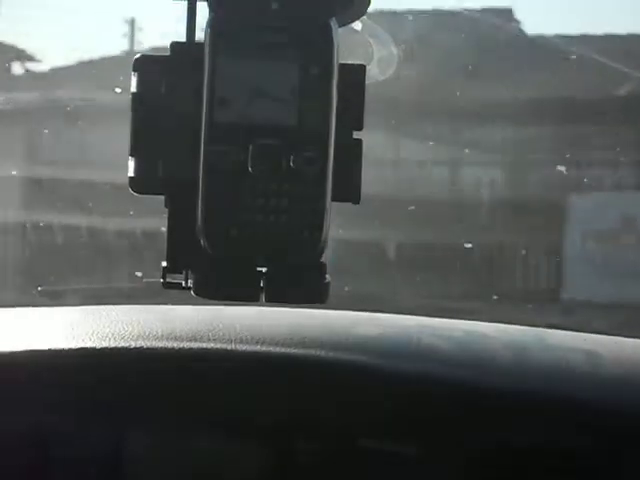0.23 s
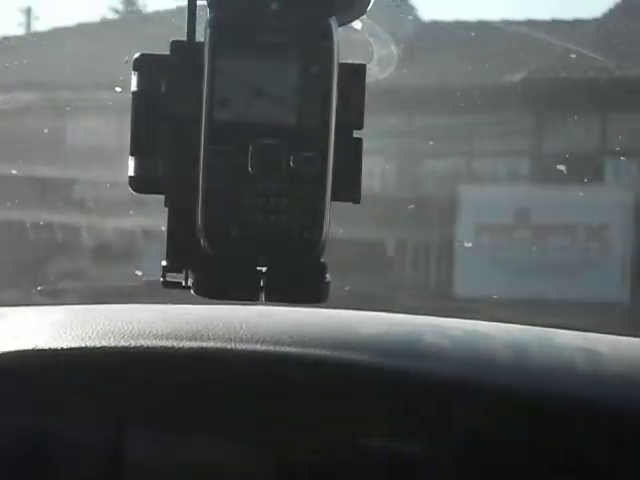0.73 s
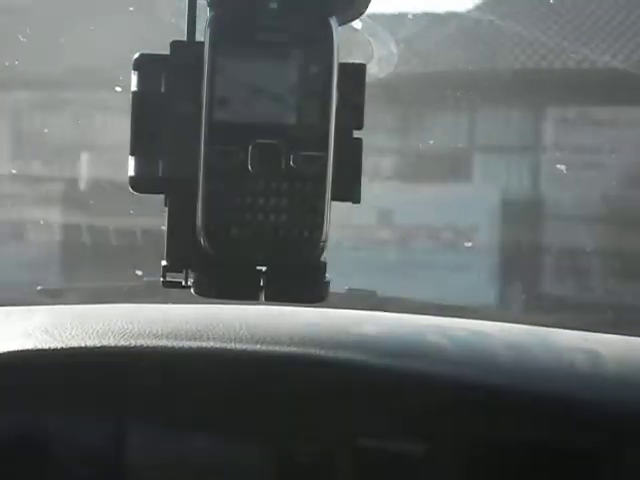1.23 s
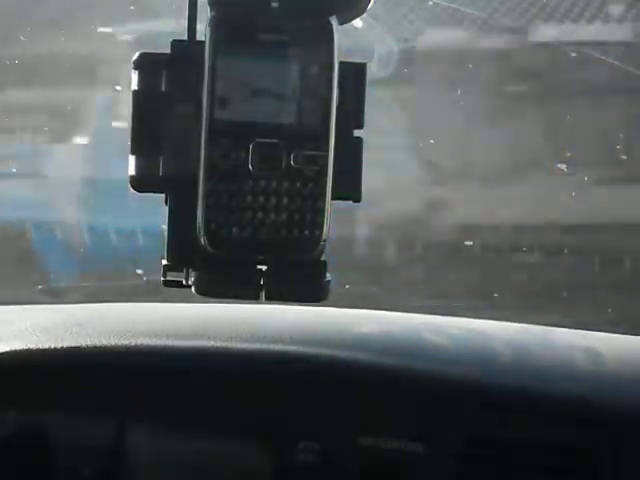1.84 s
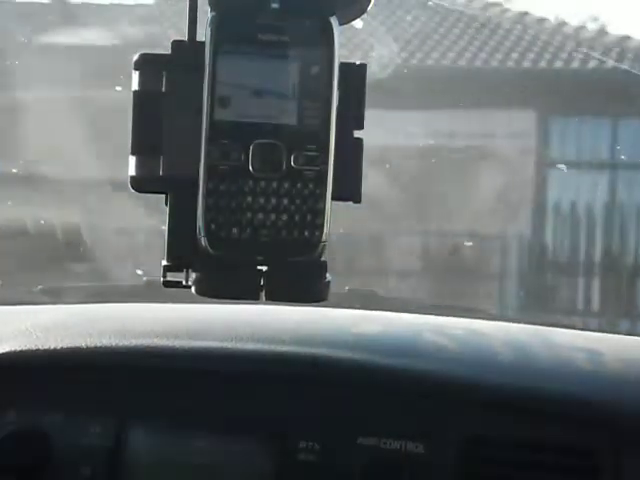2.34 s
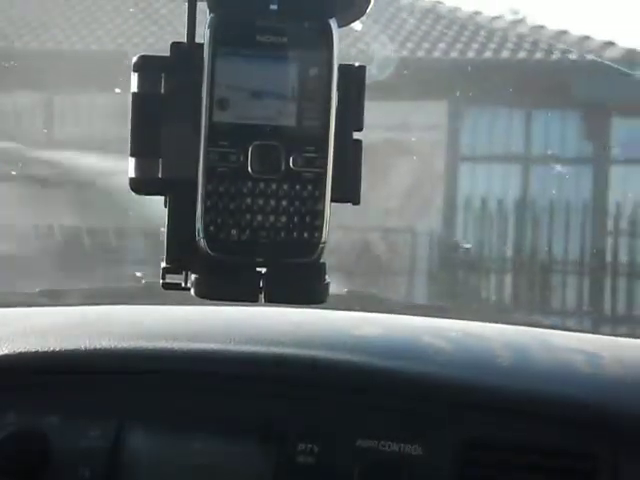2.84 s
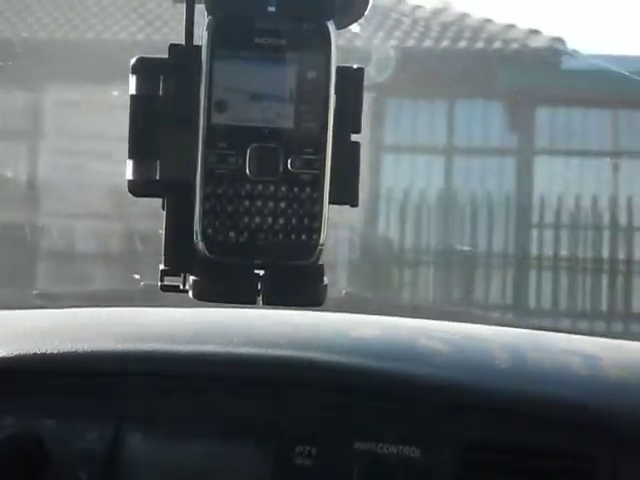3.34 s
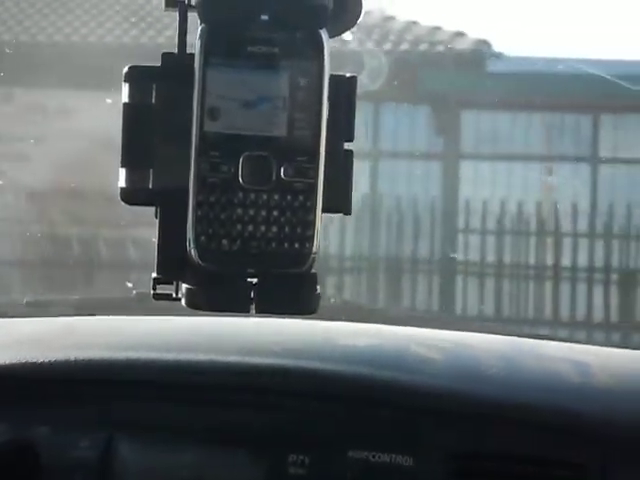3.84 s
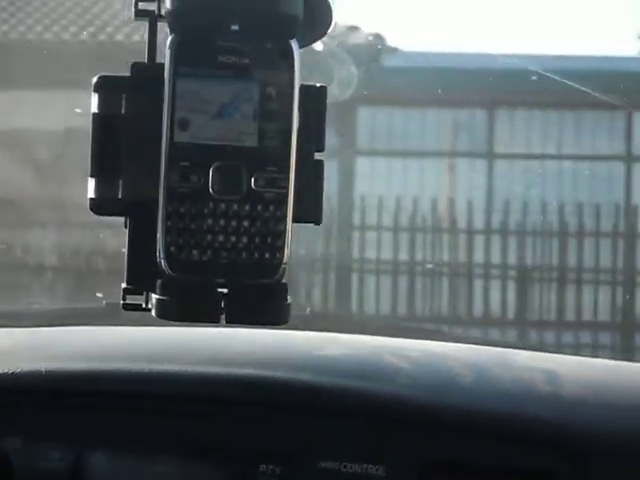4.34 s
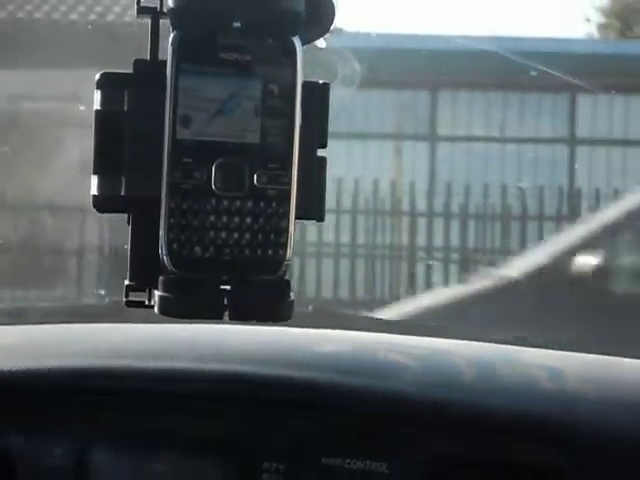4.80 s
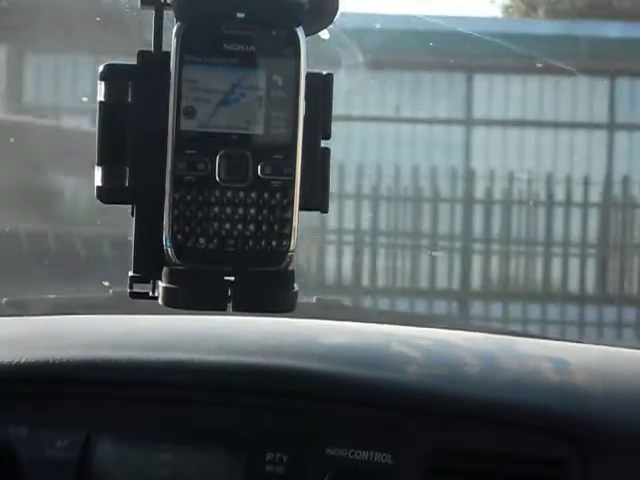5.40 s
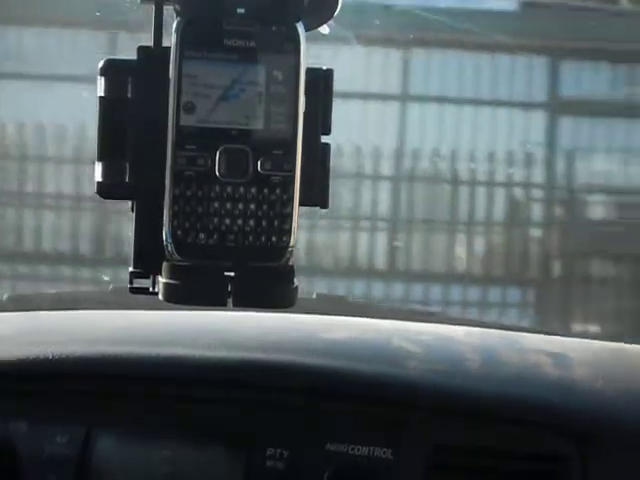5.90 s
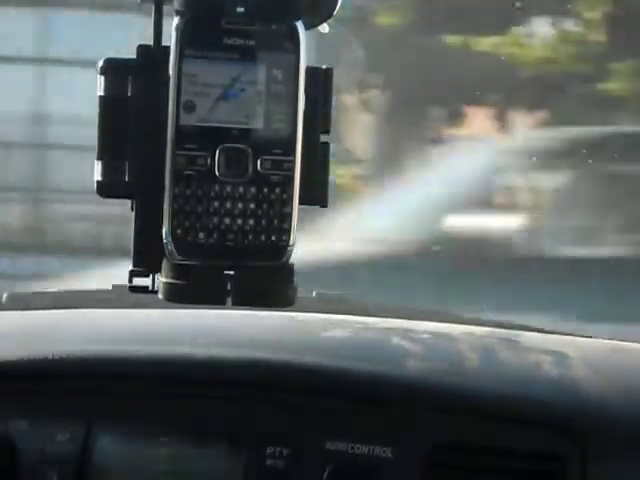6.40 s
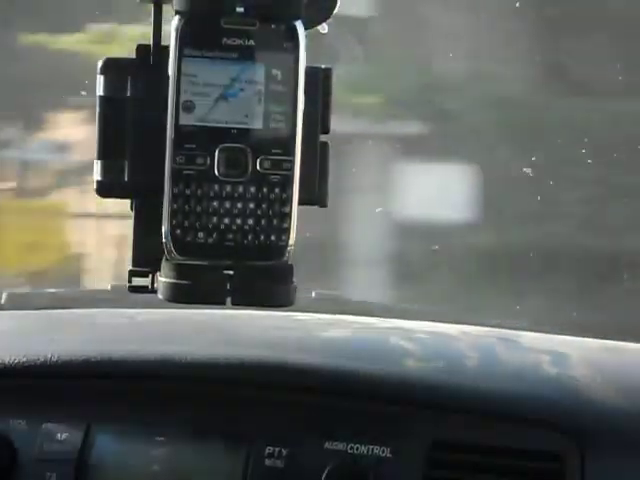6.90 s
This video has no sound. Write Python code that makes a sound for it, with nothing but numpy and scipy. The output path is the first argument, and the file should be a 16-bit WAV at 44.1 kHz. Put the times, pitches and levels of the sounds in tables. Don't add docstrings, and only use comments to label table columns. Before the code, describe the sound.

Close inside a small car, a four-cylinder engine idles in a deep, uneven boom. A turn-signal relay ticks and tocks evenly throughout. Trim and floor panels knock, strongest around three and a half seconds, with cloth rustles and plastic buzzes. The engine then revs up, sinks back and begins climbing again. Other cars pass as faint low hums under a hissy microphone.

```python
import sys
import numpy as np
from scipy import signal
from scipy.fft import rfft, irfft, next_fast_len
from scipy.io import wavfile
from scipy.ndimage import uniform_filter1d, map_coordinates

SR = 44100
rng = np.random.default_rng(int(sys.argv[2]) if len(sys.argv) > 2 else 0)


def boost(x):
    u = np.asarray(x, float) / 20
    return 10 ** u


def dump_mix(stems):
    frames = np.atleast_2d(stems).T
    limited = np.clip(frames, -1, 1)
    pcm = np.round(limited * 32767).astype(np.int16)
    wavfile.write(sys.argv[1], SR, pcm)


N = 315315

# time_s, gain_db
GAIN_RIDE = [
    (0.15, -3.5),
    (1, -0.5),
    (2.25, .5),
    (4.14, 0),
    (5.85, -.5),
    (6.15, -5),
    (6.69, -7.5),
    (7.15, -5),
]
# start_s, peak_db, ring_hz
TRIM_KNOCKS = [(.547, -32, 502), (0.75, -30, 1020), (1.325, -25.5, 610), (2.096, -25, 510),
               (2.231, -24.5, 870), (2.233, -32, 1460), (2.874, -32, 1350), (2.901, -30, 1250),
               (2.722, -31, 870), (2.871, -21, 570), (2.877, -23, 620), (2.878, -30.5, 1650),
               (2.895, -20, 615), (2.901, -23.5, 630), (2.905, -25.5, 680), (2.605, -32, 1300),
               (2.61, -26, 550), (2.631, -28, 1130), (2.64, -27, 1300), (2.643, -25, 520),
               (2.699, -30, 880), (2.776, -30, 700), (2.837, -35.5, 2450), (3.05, -39, 1600),
               (1.02, -33.5, 1050), (.963, -38, 1650), (3.339, -9, 646), (3.68, -8.5, 640),
               (3.601, -23, 620), (3.079, -25, 680), (3.385, -23, 560), (3.245, -22, 580),
               (3.707, -23, 630), (4.86, -23, 640), (5.499, -26, 690)]
# frequency_hz, level_db (per Hz)
SNAP_COLOUR = [(300, -58), (1000, -5), (2000, -5), (3500, -4), (5100, -3), (7000, -9.5), (10300, -13.5),
               (11000, -28)]


def engine():
    # time_s, firing_hz
    speed = [(0, 26), (.55, 25), (1.1, 26), (2, 25.8), (3.1, 26.2), (3.5, 28.5), (4.1, 29), (4.4, 28),
             (4.56, 31), (4.79, 39.8), (4.89, 42), (5.07, 43.5), (5.36, 41.1), (5.56, 36.9), (5.8, 30.6),
             (5.93, 28.4), (6.17, 27.7), (6.4, 29.7), (6.7, 33), (7.15, 38)]
    # start_s, level_db, hold_s
    surges = [(.2, -13.5, 0.11), (.62, -13.5, 0.17), (.82, -6, .005), (1.09, -24, 0.026),
              (1.25, -13, 0.0042), (1.47, -14, .04), (1.71, -18, 0.022), (1.91, -15, 0.071),
              (2.37, -7.5, .005), (2.45, -13, 0.059), (2.7, -16.5, 0.11), (2.91, -12.5, .005),
              (3.27, -12, 0.055), (3.44, -10.5, .005), (3.68, -10, 0.064), (4.1, -14, 0.086),
              (4.24, -21.5, 0.098), (4.55, -16.5, 0.075), (4.78, -11, 0.75), (5.6, -14, 0.098),
              (5.81, -15.5, .005), (6.03, -7.5, 0.29), (6.35, -10.5, .17), (6.58, -18, 0.05),
              (6.73, -20, .005), (6.85, -20, .005), (6.99, -18, .03), (7.14, -8, 0.0098)]
    # time_s, growl_db (block), upper_db (orders beside the boom)
    load_points = [(0, -43, -33), (.35, -42, -35), (1.1, -39.5, -32), (1.6, -41, -32.5),
                   (2.2, -38.5, -34.5), (3.1, -40, -47), (3.5, -38, -34), (4.1, -41, -45),
                   (4.35, -37.5, -57), (4.6, -33, -37), (4.8, -30.5, -31), (5.3, -31.5, -31.5),
                   (5.55, -33.5, -35.5), (5.75, -36, -53), (6.1, -41, -40), (6.3, -41.5, -56),
                   (6.7, -41, -46), (7.15, -34.5, -55)]
    # multiple (of the firing rate), level_db
    orders = [(.5, 0), (1.5, -5), (2, 9), (2.5, -21), (3, 0), (4, 0), (5, -6), (6, -8)]
    # frequency_hz, gain_db
    mounts = [(15, -12), (55, 0), (70, -3), (86, -11.5), (104, 0.5), (130, 0), (170, -0.5), (220, -2),
              (350, -5)]
    # sump_db, bulkhead_db
    cylinders = [
        (0, -3),
        (-12, -1),
        (-8, 0),
        (-13, -4),
    ]
    # centre_hz, width_hz, level_db
    sump_modes = [(350, 46, 0.5), (390, 73, -2.5)]
    # centre_hz, width_hz, level_db
    cabin_modes = [(437.3, 34.6, -0.5), (492.8, 27, 4), (549, 24.5, 1.5), (656, 90, -6), (738, 40, -3),
                   (782.7, 17, 1), (900, 130, -13), (1208, 48, -11.5), (1646, 230, -17.5)]
    first_fires_s = 5.113

    firing_hz, = curves(speed)
    growl_db, upper_db = curves(load_points)
    firing_hz = uniform_filter1d(firing_hz, size=SR // 20)
    firings = np.cumsum(firing_hz * (1 + 0.0017 * wobble(8))) / SR
    firings = firings - firings[round(first_fires_s * SR)]
    phase = 2 * np.pi * firings

    boom_db = swells(surges, rise=220, fall=146, floor_db=-25)
    boom = boost(boom_db - 2.4 + 0.7 * wobble(18)) * np.sqrt(2) * np.sin(phase)

    upper = 0
    for multiple, db in orders:
        order_db = db + along(mounts, multiple * firing_hz) + 0.9 * wobble(3.7)
        upper = upper + boost(order_db) * np.sin(multiple * phase + multiple ** 2)

    fired = np.diff(np.floor(firings), prepend=np.floor(firings[0]))
    cylinder = np.floor(firings).astype(int) % len(cylinders)
    sump_db, bulkhead_db = np.transpose(cylinders)[:, cylinder]
    thump = unit(filtered(fired * boost(sump_db + 2.4 * wobble(25)), resonances(sump_modes)))
    blows = unit(filtered(fired * boost(bulkhead_db + 1.2 * wobble(31)), resonances(cabin_modes)))
    hum = unit(filtered(rng.standard_normal(N), resonances(cabin_modes)))

    load = np.clip((growl_db + 46.5) / 12, 0, 1)
    growl = 0.85 * hum + 0.5 * load * blows + (0.18 + 0.32 * load) * thump
    growl_gain = boost(growl_db - 0.65 + 1.4 * wobble(10))
    return boom + boost(upper_db + 0.5) * upper + growl_gain * growl


def flasher():
    # mode_hz, peak_db, rise_s, t60_s
    tick_modes = [(1236, -20, 0.0028, 0.028), (2930, -3.5, 0.0029, 0.046), (4130, -10, 0.0043, 0.054),
                  (5370, -13, .002, 0.027), (5980, -15, 0.00093, 0.048), (6230, -18, 0.0011, 0.054),
                  (6660, -12.5, 0.00071, 0.043)]
    # mode_hz, peak_db, rise_s, t60_s
    tock_modes = [(2920, -8, 0.0017, 0.033), (3740, -17, 0.0025, 0.055), (5383, -3.5, 0.0016, 0.025),
                  (5417, -11.5, 0.0022, 0.039), (8500, -17, .001, .03), (8900, -12, 0.00085, 0.028)]
    ticks = relay(flashes(first_s=0.067, db=-28), tick_modes, crack_db=-7.0)
    tocks = relay(flashes(first_s=0.4447, db=-28.5), tock_modes, crack_db=-7.0)
    return ticks + tocks


def flashes(first_s, db):
    flash_s, count = 0.7079, 10
    start_s = first_s + flash_s * np.arange(count)
    return list(zip(start_s, db + np.interp(start_s, *np.transpose(GAIN_RIDE))))


def relay(events, modes, crack_db):
    lead_s, scatter_db = 0.0011, 1.5
    out = np.zeros(N + SR)
    t = np.arange(SR // 10) / SR
    for start_s, db in events:
        ring = 0
        for hz, peak_db, rise_s, t60_s in modes:
            decay = boost(peak_db + scatter_db * rng.normal() - 60 * t / t60_s)
            ring = ring + decay * (1 - np.exp(-t / rise_s)) ** 2 * np.sin(2 * np.pi * hz * t)
        bounce = np.pad(ring, (round(0.009 * SR), 0))[:len(t)]
        out[round((start_s - lead_s) * SR):][:len(t)] += boost(db + 3.0) * (ring + 0.14 * bounce)
    cracks = [(start_s - lead_s, db + crack_db, 0.06) for start_s, db in events]
    return out[:N] + bursts(cracks, attack=0.002) * noise(SNAP_COLOUR)


def trim():
    # frequency_hz, level_db (per Hz)
    panel_colour = [(150, -54), (380, -4), (600, 6), (900, -3), (1700, -16), (3000, -42)]
    stiffens = 0.12
    rebound_rise = 1.074
    hits = contacts()
    ring = np.zeros(N + SR)
    t = np.arange(SR // 8) / SR

    for start_s, db, hz, swell_s, rebound_db, _ in hits:
        u = t / swell_s
        stiffer = t * (1 + stiffens * (u / 2 - 1))
        swell = boost(db) * (u * np.exp((1 - u ** 3) / 3)) ** 1.41

        def blow(f):
            main = np.sin(2 * np.pi * f * stiffer)
            below = 0.25 * np.sin(2 * np.pi * 0.83 * f * t)
            above = 0.13 * np.sin(2 * np.pi * 1.24 * f * t)
            return swell * (main + below + above)

        rebound_s = start_s + 0.0015 + 2 * swell_s
        ring[round(start_s * SR):][:len(t)] += blow(hz)
        ring[round(rebound_s * SR):][:len(t)] += boost(rebound_db) * blow(rebound_rise * hz)

    snap_rows = [(s, db + snap_db - 5.0, 18 * swell_s) for s, db, _, swell_s, _, snap_db in hits]
    snaps = bursts(snap_rows, attack=0.00099)
    shudder = bursts([(s, db - 17.5, 0.2) for s, db, _ in TRIM_KNOCKS], attack=0.0036)
    return ring[:N] + snaps * noise(SNAP_COLOUR) + shudder * noise(panel_colour)


def contacts():
    # start_s, peak_db, ring_hz
    thuds = [(1.301, -19.5, 131.4), (1.319, -18.5, 198), (1.325, -22, 115), (2.165, -24, 149),
             (2.164, -19, 341), (2.17, -15.5, 248), (2.68, -21, 172), (2.893, -13, 135), (2.961, -19, 260),
             (3.35, -28, 225), (3.564, -23, 287), (3.689, -15.5, 190)]
    # start_s, peak_db, ring_hz, snap_db
    taps = [(2.7, -30.5, 2540, -3), (3.6, -21, 900, -14), (3.142, -12.5, 1060, -17), (3.8, -26, 730, -12),
            (3.096, -32, 1780, -6), (3.202, -28, 1150, 4), (3.564, -21, 850, -8), (2.233, -30, 1530, -9),
            (3.864, -25, 1020, -20), (3.34, -28, 1660, -20), (3.344, -30, 1800, -20),
            (3.684, -30, 1700, -20), (3.69, -28, 1700, -20), (2.168, -23, 780, -11), (4.3, -29, 1180, -4),
            (3.863, -30, 2870, 4), (3.864, -35, 4100, -20), (3.565, -28.5, 2500, -6),
            (3.565, -28, 1520, -20), (2.5, -33, 1200, -12), (4.518, -25, 1150, -17), (4.671, -28, 800, -18),
            (5.614, -33, 660, -22), (6.559, -40, 1800, 3)]
    # start_s, peak_db, ring_hz,
    # snap_db
    clicks = [(1.7145, -27.5, 1880, -1), (1.7145, -30, 4680, -4), (1.718, -35, 3100, -4),
              (1.718, -33, 6460, -20), (1.726, -38, 4250, -11), (5.44, -20.5, 1800, -7.5),
              (5.441, -30, 4840, -4.5), (5.444, -36, 2850, -6), (5.446, -33, 5000, -20),
              (4.62, -39, 3270, -40), (4.398, -42, 5400, -40), (4.603, -43, 3370, -40),
              (4.634, -42, 3250, -40), (4.662, -39, 3330, -40)]
    return ([(s, db, hz, 1.5 / hz, -7.5, -36) for s, db, hz in thuds]
            + [(s, db, hz, 0.0034, -7.5, -23.5) for s, db, hz in TRIM_KNOCKS]
            + [(s, db, hz, 0.0013, -12, snap_db) for s, db, hz, snap_db in taps]
            + [(s, db, hz, 0.0032, -19, snap_db) for s, db, hz, snap_db in clicks])


def cloth():
    # start_s, rms_db, length_s
    rustles = [(2.82, -44.5, 0.041), (4.023, -46, 0.013), (4.062, -41, 0.016), (4.088, -45, .018),
               (4.212, -43, 0.0054), (4.328, -48, .01), (4.235, -48, 0.016), (4.268, -42.5, 0.015),
               (4.395, -50, 0.023), (4.418, -42.5, 0.016), (5.36, -48, 0.053), (5.75, -49, 0.022),
               (5.8, -50.5, 0.061)]
    # frequency_hz, level_db (per Hz)
    cloth_colour = [(300, -94), (1500, -10), (3500, -1.5), (7000, -4.5), (10300, -8.5), (11000, -18)]
    # start_s, rms_db, length_s
    rattles = [(2.16, -61, 0.077), (.62, -48.5, .25), (2.27, -43, .16), (2.59, -41, 0.027),
               (2.628, -36.5, .026), (2.69, -42, 0.045), (2.82, -40, 0.025), (2.872, -36, 0.014),
               (2.895, -40, .018), (3.06, -42.5, 0.049), (3.24, -39, 0.046), (3.3, -40, 0.026),
               (3.55, -42.5, 0.15), (4.06, -43.5, 0.038), (5.74, -41, 0.12)]
    # frequency_hz, level_db (per Hz)
    buzz_colour = [(300, -45), (600, 7), (1300, 0), (1900, -3.5), (2800, -11), (4500, -30)]
    buzz = scrapes(rattles, buzz_colour, grain_rate=220, grain_db=2.5)
    return scrapes(rustles, cloth_colour, grain_rate=580, grain_db=-1.5) + buzz


def scrapes(rows, colour, grain_rate, grain_db):
    t = np.arange(0, N / SR, 1 / 1000)
    strokes = 0
    for start_s, db, length_s in rows:
        off_centre = (t - start_s - 0.5 * length_s) / (0.78 * length_s)
        strokes = strokes + boost(db) * np.exp(-off_centre ** 4)
    envelope = np.interp(np.arange(N) / SR, t, strokes)
    return envelope * boost(grain_db * wobble(grain_rate)) * noise(colour)


def traffic():
    # nearest_s, half_length_s, pitch_hz, glide_hz_per_s, level_db
    passes = [
        (1.48, 0.35, 58, -1, -30.5),
        (2.58, 0.807, 58.4, -2.5, -26.5),
        (3.63, 0.367, 37.7, 1.5, -21),
        (4.302, 0.27, 55, 17, -26),
        (5.4, 0.2, 57.5, -29.5, -30),
        (3.7, .35, 192, 2.5, -40),
        (6.45, 0.505, 90, 19, -35),
        (0.23, 0.19, 43, 5.5, -24),
        (2.1, .25, 100, 10, -34),
    ]
    t = np.arange(N) / SR
    out = 0
    for nearest_s, half_s, hz, glide, db in passes:
        note_hz = hz + glide * np.clip(t - nearest_s, -2 * half_s, 2 * half_s)
        passing = np.exp(-((t - nearest_s) / half_s) ** 4)
        level = boost(db + 4.0 + 1.05 * wobble(4.8))
        cycles = np.cumsum(note_hz * (1 + 0.01134 * wobble(8.1))) / SR
        out = out + passing * level * np.sin(2 * np.pi * cycles)
    return out


def road():
    # start_s, level_db, hold_s
    bumps = [(.2, -19, 0.17), (.5, -18.5, 0.025), (.74, -18, 0.23), (1.23, -17, 0.045), (1.6, -21, .06),
             (1.95, -22.5, 0.21), (2.33, -18, .04), (2.53, -19, .01), (2.7, -24.5, 0.33),
             (3.23, -16.5, .01), (3.38, -22, 0.065), (3.98, -29, .01), (4.22, -23.5, .01),
             (4.48, -22, 0.042), (4.72, -19.5, .01), (4.95, -23, 0.075), (5.6, -23.5, 0.19),
             (5.97, -21, 0.053), (6.15, -27, 0.96)]
    # time_s, drum_db
    coarseness = [(0, -36), (.3, -36), (.74, -31.5), (1, -34.5), (1.2, -31.5), (1.65, -34.5), (2.35, -28.5),
                  (2.55, -34), (3.1, -31.5), (3.35, -27), (3.8, -29), (4.05, -33), (4.5, -34.5), (4.7, -29),
                  (4.9, -32.5), (5.4, -32.5), (5.7, -32), (6, -31), (6.15, -35), (7.15, -35.5)]
    # frequency_hz, level_db (per Hz)
    shake_colour = [(7.1, -29), (12, -7.5), (32, 8.5), (110, -8.5), (140, -49), (240, -120)]
    drum_colour = [(50, -43), (85, -6), (182, -6.5), (282, -14.5), (506, -19), (612, -21.5), (771, -20),
                   (860, -27.5), (1630, -38.5), (2200, -43), (2860, -56), (4840, -120)]
    hiss_colour = [(590, -29), (1000, -2.5), (1360, -6.5), (1620, -3), (1920, -7.5), (2920, -8),
                   (4650, -10.5), (9290, -14), (10200, -16), (11200, -27), (11800, -27), (15300, -61),
                   (22000, -120)]

    shake_db = swells(bumps, rise=57, fall=57, floor_db=-33)
    drum_db, = curves(coarseness)
    gain_db, = curves(GAIN_RIDE)
    shake = boost(shake_db + 1.33) * noise(shake_colour)
    drum = boost(drum_db + 1.5 * wobble(14)) * noise(drum_colour)
    flutter_db = 0.4 * wobble(15) + 0.6 * wobble(45)
    hiss = boost(-45 + gain_db + flutter_db) * noise(hiss_colour)
    return shake + drum + hiss


def whine():
    # pitch_hz, level_db
    tone = (7853, -72)
    pitch_hz, level_db = tone
    return boost(level_db) * np.sin(2 * np.pi * pitch_hz * np.arange(N) / SR + 3.3 * wobble(7.9))


def unit(x):
    return x / np.sqrt(np.mean(x ** 2) + 1e-20)


def curves(rows):
    s, *cols = np.transpose(rows)
    return [np.interp(np.arange(N) / SR, s, c) for c in cols]


def along(points, hz):
    f, v = np.transpose(points)
    return np.interp(np.log(hz + 1), np.log(f + 1), v)


def wobble(rate):
    t = np.arange(0, N / SR + 0.002, 1 / 1500)
    knots = np.clip(rng.standard_normal(int(N * rate / SR) + 4), -1.7, 1.7)
    return np.interp(np.arange(N) / SR, t, map_coordinates(knots, [t * rate]))


def swells(rows, rise, fall, floor_db):
    t = np.arange(0, N / SR, 1 / 1000)[:, None]
    s, db, hold = np.transpose(rows)
    level_db = db - rise * np.maximum(s - t, 0) - fall * np.maximum(t - s - hold, 0)
    return np.interp(np.arange(N) / SR, t[:, 0], np.maximum(level_db.max(axis=1), floor_db))


def bursts(rows, attack):
    out = np.zeros(N + SR)
    t = np.arange(SR // 4) / SR
    for s, db, t60 in rows:
        out[round(s * SR):][:len(t)] += boost(db - 60 * t / t60) * (1 - np.exp(-t / attack))
    return out[:N]


def filtered(x, response):
    m = next_fast_len(N + SR // 2)
    return irfft(rfft(x, m) * response(np.fft.rfftfreq(m, 1 / SR)), m)[:N]


def noise(spectrum):
    return unit(filtered(rng.standard_normal(N), lambda hz: boost(along(spectrum, hz))))


def resonances(modes):
    def response(f):
        total = 0
        for k, (c, w, db) in enumerate(modes):
            total = total + (-1) ** k * boost(db) * 1j * f * w / (c * c - f * f + 1j * f * w)
        return total
    return response


def scene():
    return (engine() + flasher() + trim() + cloth() + traffic() + road() + whine())[None]


def top_cut(x):
    return signal.sosfilt(signal.butter(12, 11930, fs=SR, output="sos"), x)


def record(dry):
    def edge(hz):
        return boost(np.interp(hz, [10330, 10900, 12140, 12400], [0, -4.5, -6.5, -38.5]))

    squeezed = dry[0] / (1 + np.abs(dry[0] / 0.68) ** 4) ** (1 / 4)
    return top_cut(filtered(squeezed, edge)[None])


dry = scene()
out = record(dry)
dump_mix(out)
```